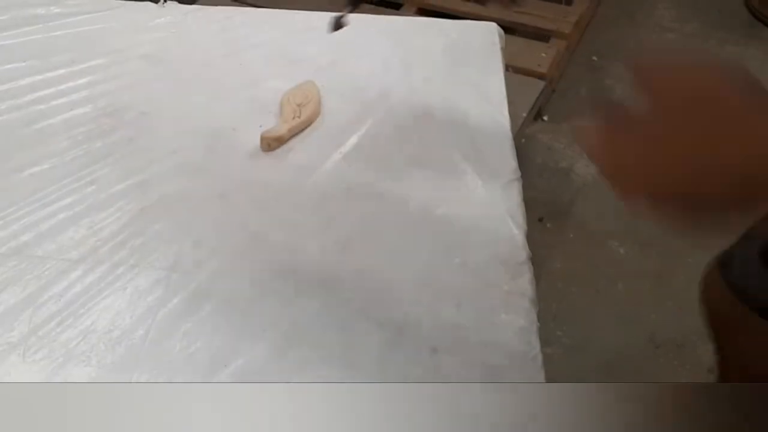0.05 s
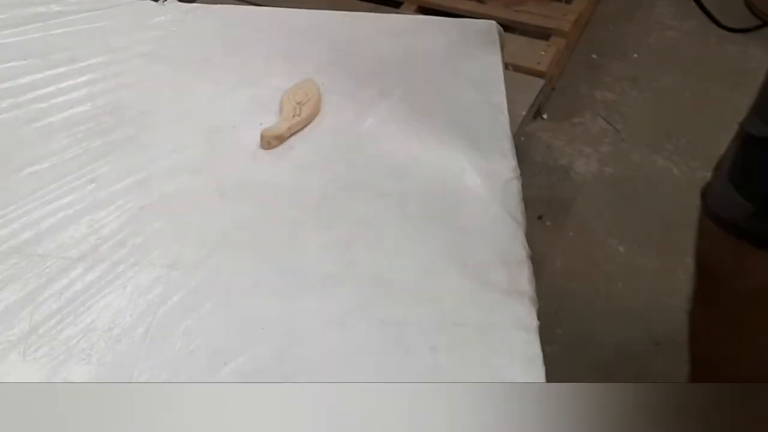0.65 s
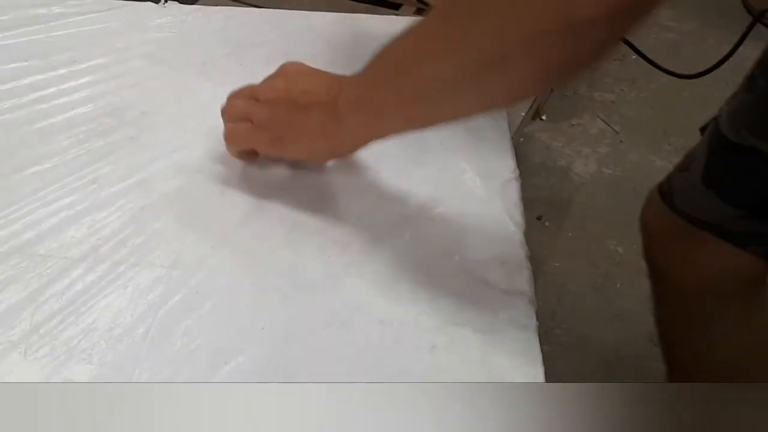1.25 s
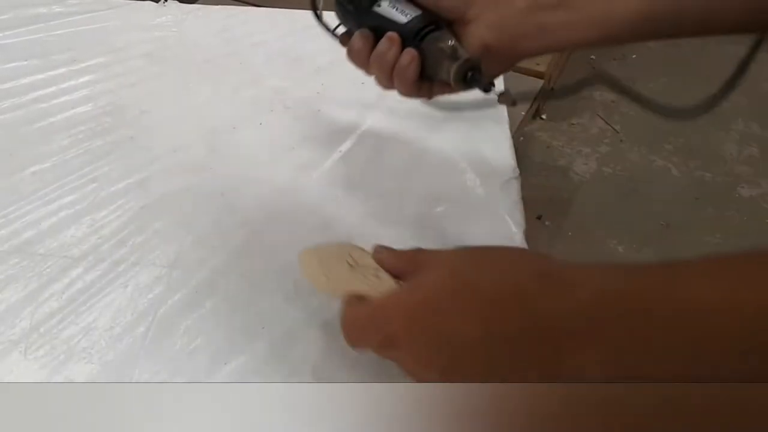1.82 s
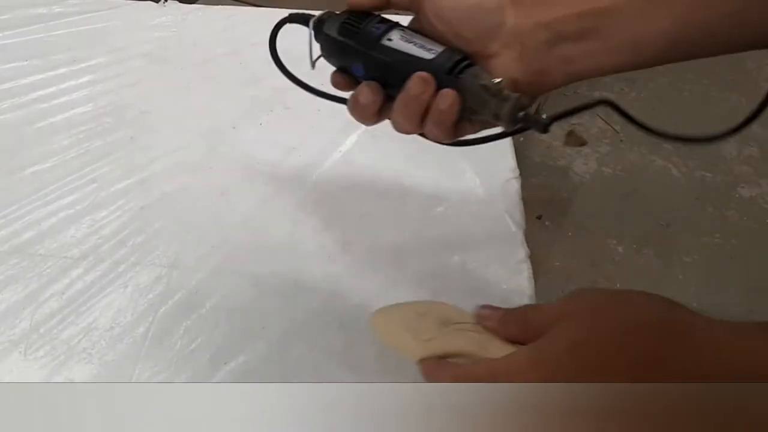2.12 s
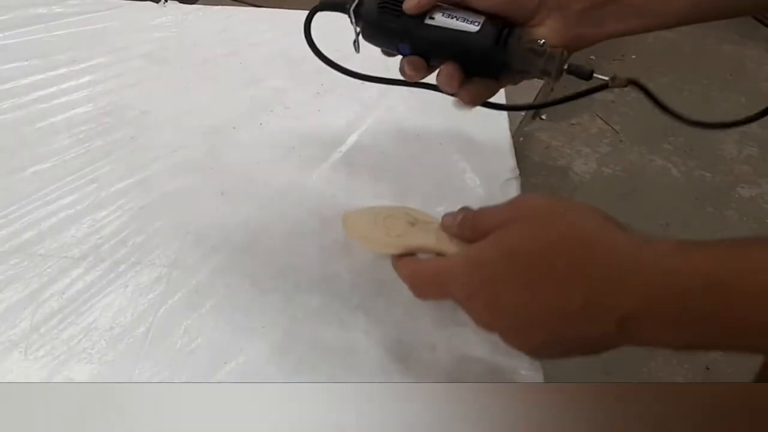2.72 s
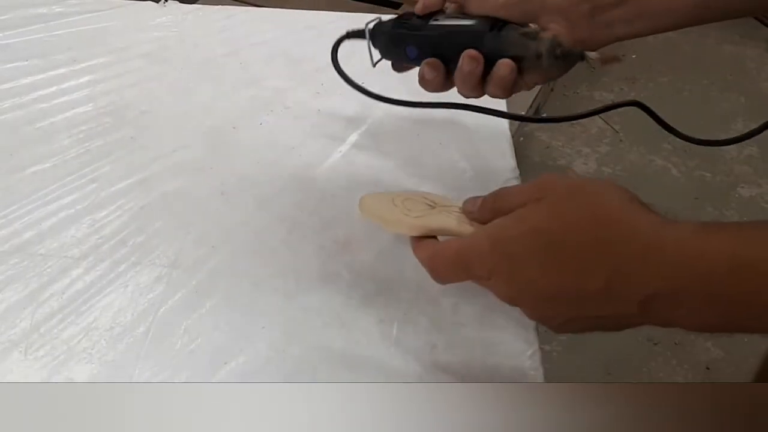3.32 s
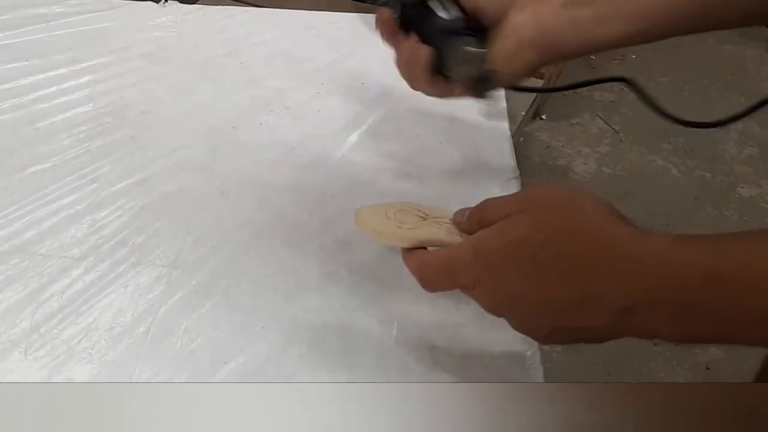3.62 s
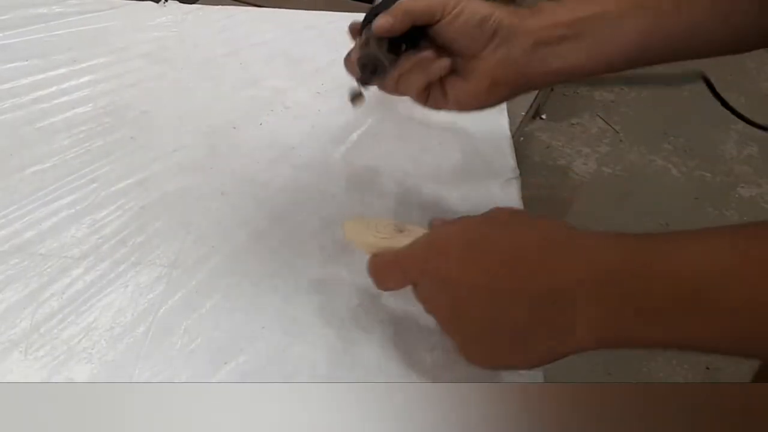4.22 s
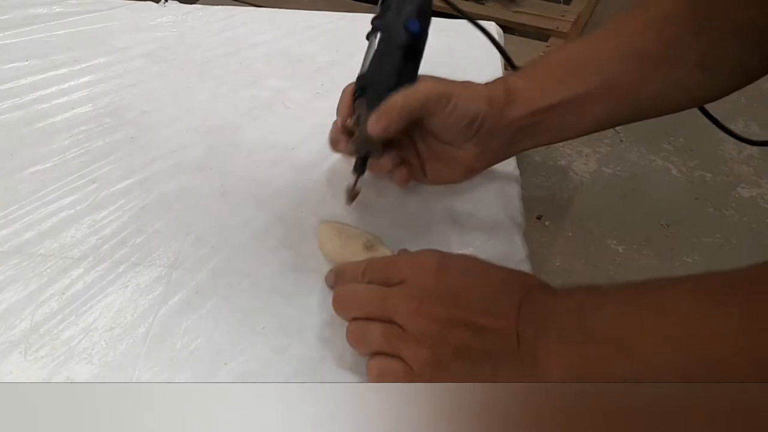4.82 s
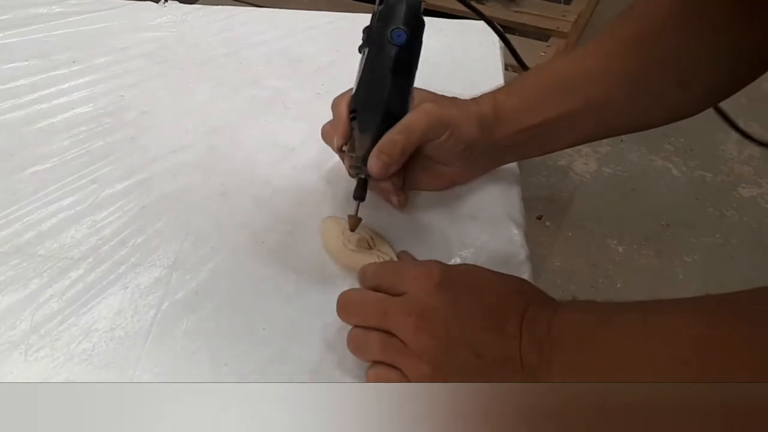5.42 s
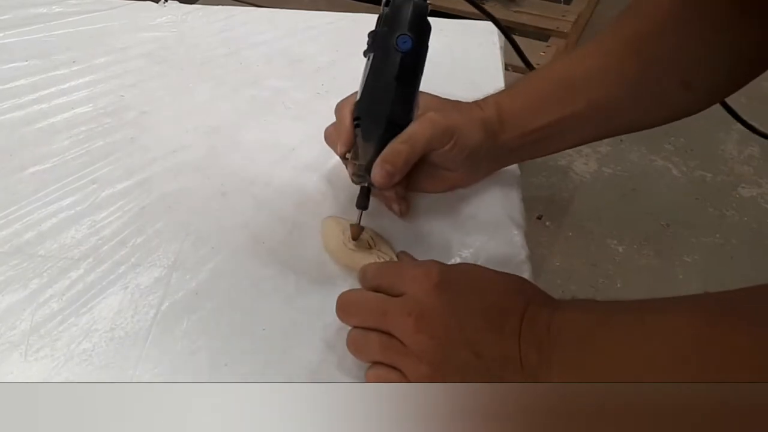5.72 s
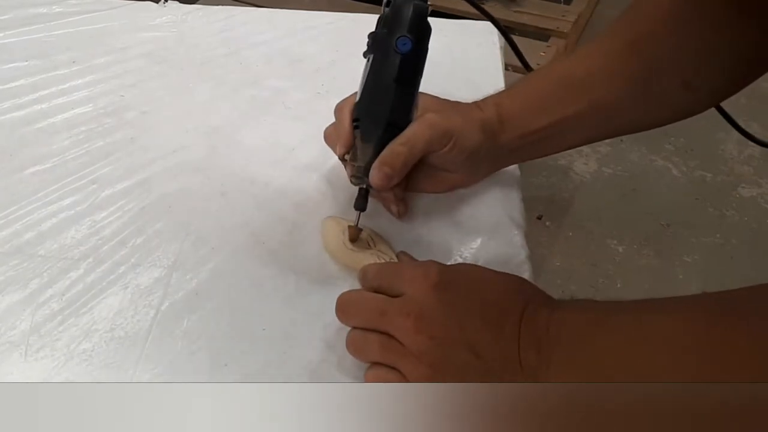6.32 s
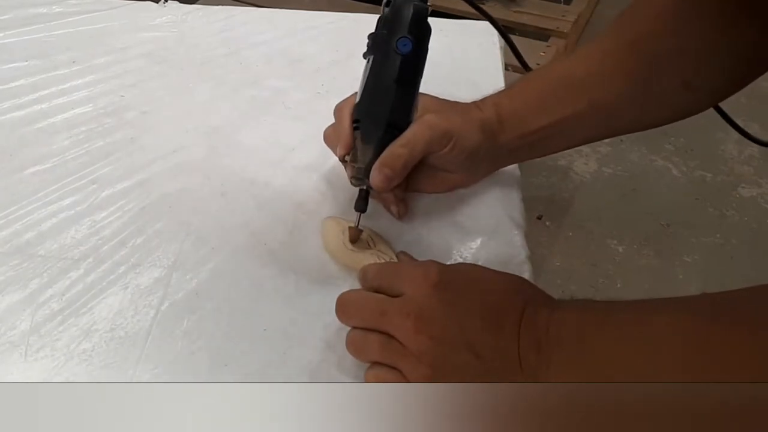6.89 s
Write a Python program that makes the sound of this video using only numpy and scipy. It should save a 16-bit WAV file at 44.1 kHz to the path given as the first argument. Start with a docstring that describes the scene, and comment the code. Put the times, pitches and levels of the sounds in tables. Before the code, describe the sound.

A small piece of wood scrapes off a bench, then a rotary tool clicks on, winds up to a whine and grinds into it.

```python
"""A rotary tool winds up to a whine, then its burr (the cutting tip) bites wood with a loud, pitched drone.
The mains motor buzzes and hums, while its fan whistles and blows air through the vents.
The tool's tones follow the speed of its shaft, which sags once the burr is deep in the wood.
Before that, a hand slides a small piece of wood off a sheet-covered bench and clicks the switch.
Other machines hum far off in the workshop throughout."""
import sys
import numpy as np
from scipy import signal
from scipy.fft import rfft, irfft, next_fast_len
from scipy.io import wavfile
from scipy.ndimage import map_coordinates

SR = 44100
rng = np.random.default_rng(int(sys.argv[2]) if len(sys.argv) > 2 else 0)


def log_audio(samples):
    """Write samples as a 16-bit WAV file to the path given in sys.argv[1]."""
    # one column per channel
    frames = np.atleast_2d(samples).T
    # limit to full scale, then quantise
    limited = np.clip(frames, -1, 1)
    pcm = np.round(limited * 32767).astype(np.int16)
    wavfile.write(sys.argv[1], SR, pcm)


N = 315315
TIME = np.arange(N) / SR
SIDES = np.array([[1], [-1]]) / 2  # splits a difference between left and right
MAINS_HZ, FULL_SPEED_HZ = 60, 413  # the electric supply; shaft turns a second
MOTOR_ON_S, DEEP_CUT_S = 3.304, 6.417
SWING_START_S, SWING_LENGTH_S = 3.7, 0.33  # the tool is swung round towards the bench


def amp(db):
    """Turns decibels into a number to multiply a sound by."""
    return 10 ** (np.asarray(db) / 20)


def unit(x):
    """Scales a signal to an average strength (rms) of 1."""
    return x / np.sqrt(np.mean(x ** 2) + 1e-20)


def along(points, hz):
    """Reads between rows of (pitch_hz, value), with octaves evenly spaced."""
    pitches, values = np.transpose(points)
    return np.interp(np.log(hz + 1), np.log(pitches + 1), values)


def curves(rows):
    """Joins timed rows into one curve for each column after the time."""
    times, *columns = np.transpose(rows)
    return [np.interp(TIME, times, column) for column in columns]


def wobble(rate):
    """A smooth curve through `rate` random values a second."""
    return map_coordinates(rng.standard_normal(int(N * rate / SR) + 4), [TIME * rate])


def settle(start_s, rise_s):
    """Rises from 0 towards 1, getting about two thirds of the way in rise_s."""
    return 1 - np.exp(-np.maximum(TIME - start_s, 0) / rise_s)


def until(start_s, length_s):
    """1 before a movement of the hand, falling to 0 once it is done."""
    return np.clip(1 - (TIME - start_s) / length_s, 0, 1)


def driven(speed, full_db, range_db):
    """Strength of a sound that starts with the motor and grows by range_db up to full speed."""
    return amp(full_db - range_db * (1 - speed / FULL_SPEED_HZ)) * (TIME > MOTOR_ON_S)


def pan(left_db):
    """Left and right strengths, with the left louder by left_db."""
    return amp(left_db * SIDES)


def filtered(x, response):
    """Multiplies each frequency in x by response(hz)."""
    size = next_fast_len(N + SR // 4)
    return irfft(rfft(x, size) * response(np.fft.rfftfreq(size, 1 / SR)), size)[..., :N]


def partials(table, angle, waver_db, slip=0):
    """Wavering tones at whole multiples of the shaft speed; slip holds their waves back."""
    def tone(multiple):
        return np.sin(round(multiple) * angle - slip + rng.uniform(0, 2 * np.pi))
    return np.sqrt(2) * sum(amp(db + waver_db * wobble(14)) * pan(left_db) * tone(multiple)
                            for multiple, db, left_db in table)


# how alike a close sound is on the left and right (1 = the same): pitch_hz, likeness
NEAR_LIKENESS = [(100, 1), (640, 0.64), (1400, 0.69), (6000, 0.33), (15000, 0.24)]
def noise(spectrum, likeness=NEAR_LIKENESS):
    """Stereo noise of a standard strength, coloured by rows of (pitch_hz, relative_db)."""
    def colour(hz):
        spread = np.arccos(np.clip(along(likeness, hz), -1, 1)) / 2
        return amp(along(spectrum, hz)) * [np.cos(spread), np.sin(spread)]
    mid, side = filtered(rng.standard_normal((2, N)), colour)
    return np.array([mid + side, mid - side]) / np.std(mid)


# the room's low rush and its faint high hiss: pitch_hz, relative_db
RUSH_COLOUR = [(25, -50), (55, -9), (80, -14), (112, -2), (150, -7.5), (205, -3.5), (270, -7.5), (420, -2),
               (800, -8.5), (1300, -14.5), (2200, -20), (3200, -32), (8000, -59)]
HISS_COLOUR = [(1000, -18), (5600, -7.5), (6150, 1.5), (7500, -0.5), (8600, -12.5), (9600, -6.5),
               (16000, -7.5)]
# how alike the room sounds on the left and right: pitch_hz, likeness
ROOM_LIKENESS = [(60, 0.91), (180, 0.99), (550, 0.47), (1650, -0.26), (4970, -0.029), (15000, -0.018)]
# machines humming far off: pitch_hz, relative_db
MACHINE_HUMS = [(118.4, -59), (209.9, -57), (398.4, -59), (796.7, -60.5), (1157, -114), (1195, -64)]
def workshop(rush_db, hum_db, hiss_db):
    """Distant machines fill the room with a rush and wavering hums, under a faint hiss."""
    hums = sum(amp(db + 1.7 * wobble(5)) * np.sin(2 * np.pi * hz * TIME + 0.66 * wobble(7))
               for hz, db in MACHINE_HUMS)
    rush = amp(rush_db) * noise(RUSH_COLOUR, ROOM_LIKENESS)
    hiss = amp(hiss_db) * noise(HISS_COLOUR, ROOM_LIKENESS)
    return rush + amp(hum_db) * hums + hiss


# how long the echo takes to fade by 60 dB: pitch_hz, fade_s
ECHO_FADES = [(200, 0.11), (2000, 0.74), (12000, 0.2)]
def wall_echo(x):
    """Sound bounces between the walls, each pitch dying away at its own speed."""
    hz, t, spectra = signal.stft(rng.standard_normal((2, SR // 2)), SR, nperseg=256)
    fade = amp(-60 * t / along(ECHO_FADES, hz)[:, None])
    tail = signal.istft(spectra * fade, SR, nperseg=256)[1]
    return signal.fftconvolve(x, tail / np.linalg.norm(tail[0]), axes=1)[:, :N]


# fingertips touching the sheet: start_s, level_db, fade_s
SHEET_TOUCHES = [(1.118, -50, 0.12), (1.162, -59, .45), (1.215, -54, .07)]
# the sheet's bright crackle: pitch_hz, relative_db
SHEET_COLOUR = [(800, -12), (3000, -4), (9000, 1), (14500, -1)]
def sheet_crinkle(grain_db):
    """The sheet on the bench crackles under the fingertips."""
    touches = sum(amp(db - 60 * np.maximum(TIME - start_s, 0) / fade_s) * (TIME > start_s)
                  for start_s, db, fade_s in SHEET_TOUCHES)
    return touches * noise(SHEET_COLOUR) * unit(amp(grain_db * wobble(900)))


# fingers, then the wood, rubbing on the bench: start_s, length_s, level_db
RUBS = [(1.165, .09, -53), (1.415, 0.057, -59.5), (1.548, 0.053, -38)]
# the dull sound of rubbing: pitch_hz, relative_db
SCRAPE_COLOUR = [(180, -24), (400, -10), (630, -2), (820, -8.5), (1100, -2.5), (1450, -3.5), (1850, -9.5),
                 (2500, -9.5), (4000, -14.5), (6300, -21), (16000, -22)]
def bench_scrape(grain_db, rise_db_per_s, fall_db_per_s):
    """Fingers and wood scrape over the sheet; each grainy rub swells, holds and dies away."""
    rubs = 0
    for start_s, length_s, db in RUBS:
        before_s = np.maximum(start_s - TIME, 0)
        after_s = np.maximum(TIME - start_s - length_s, 0)
        rubs += amp(db - rise_db_per_s * before_s - fall_db_per_s * after_s)
    return rubs * noise(SCRAPE_COLOUR) * unit(amp(grain_db * wobble(500) + 1.1 * wobble(50.65)))


# hand and wood bumping the bench: start_s, level_db, pitch_hz
BENCH_BUMPS = [(1.114, -42, 106), (1.161, -42, 113), (4.762, -28, 279), (4.848, -32, 218),
               (4.878, -31, 237), (6.8, -36.5, 124), (6.87, -50, 140.1), (6.918, -36, 121)]
def bench_bumps(rise_s, fade_s):
    """Each bump makes the bench thud with two low, short-lived tones."""
    out = 0
    for start_s, db, hz in BENCH_BUMPS:
        age = np.maximum(TIME - start_s, 0)
        thud = np.sin(2 * np.pi * hz * age) + .5 * np.sin(2 * np.pi * 0.61 * hz * age)
        out += amp(db - 60 * age / fade_s) * (1 - np.exp(-age / rise_s)) * thud
    return out


def switch_click(start_s, level_db, fade_s):
    """The switch snaps on with a tiny burst of bright noise."""
    age = np.maximum(TIME - start_s, 0)
    snap = (age > 0) * amp(level_db - 60 * age / fade_s)
    return snap * noise([(300, -14), (3000, -1), (6500, 0), (15000, -13)])


# air hissing through the vents: pitch_hz, relative_db
VENT_COLOUR = [(150, -16), (400, -1.5), (900, -2.5), (2300, 3.5), (2850, -2), (3800, -0.5), (5800, 0),
               (6600, 1.5), (7900, 2.5), (8750, -11), (9250, -3), (11500, -4), (14500, -1), (16000, -7)]
# the roar in the hollow between hand and vents: time_s, relative_db, pitch_hz
HAND_HOLLOW = [(3.9, -41.5, 1763), (4.09, -35, 1960), (4.61, -40.5, 2021), (4.83, -40, 1648),
               (6.15, -36.5, 1432)]
def cooling_air(speed, hiss_db, roar_db, width_hz, swing_db):
    """Cooling air hisses from the vents and roars in a hollow whose pitch shifts with the grip."""
    hollow_db, hollow_hz = curves(HAND_HOLLOW)
    hiss = noise(VENT_COLOUR) * amp(0.68 * wobble(12) + 0.47 * wobble(60))
    swirls = noise([(1, 0), (width_hz, -3), (3 * width_hz, -20), (4000, -70)], likeness=[(100, 0.33)])
    # multiplying by a tone lifts the low swirls up to the hollow's pitch
    hollow_tone = np.cos(2 * np.pi * np.cumsum(hollow_hz + 120 * wobble(300)) / SR)
    roar = np.sqrt(2) * swirls * hollow_tone
    flow = driven(speed, hiss_db - swing_db * until(SWING_START_S, SWING_LENGTH_S), range_db=14)
    return flow * hiss + driven(speed, hollow_db + roar_db, range_db=18.5) * roar


# the whistle's loudness as the tool is moved about: time_s, relative_db
WHISTLE_LEVELS = [(3.75, -38.5), (3.88, -31), (4.33, -40.5), (4.57, -33), (4.71, -40), (5.16, -35),
                  (5.2, -29.5), (5.43, -33.5), (5.88, -32), (6.06, -42), (6.14, -30.5), (6.82, -34.5),
                  (6.84, -40), (7.05, -32), (7.15, -37)]
# the blades' tone, and its overtone an octave up: shaft_multiple, relative_db, left_db
BLADE_TONE = [(18, 1, -0.5)]
BLADE_OVERTONE = [(36, -10, 7.1)]
def fan_whistle(speed, angle, gain_db):
    """The fan's eighteen blades whistle, louder and brighter with speed."""
    moving_db, = curves(WHISTLE_LEVELS)
    overtone = driven(speed, 0, range_db=74) * partials(BLADE_OVERTONE, angle, waver_db=-0.5)
    slow_db = 52 * np.maximum(.85 - speed / FULL_SPEED_HZ, 0)  # quieter below 85% of full speed
    strength = amp(gain_db + moving_db - slow_db) * (TIME > MOTOR_ON_S)
    return strength * (partials(BLADE_TONE, angle, waver_db=1.13) + overtone)


# the knocking shaft: shaft_multiple, relative_db, left_db
KNOCK_TONES = [(2, -3.5, 0), (3, -7, 0), (4, -6.5, 0), (6, -8, 0), (9, -12, 0), (16, -8, 0), (17, -13, 0),
               (19, -18, 0), (23, -10, 0), (26, -23, 0.0058)]
def motor_hum(speed, angle, hum_db, coils_db, swing_db):
    """The off-balance shaft hums and knocks as it turns; the coils hum with the mains."""
    mains = 2 * np.pi * MAINS_HZ * TIME
    coils = amp(coils_db) * (np.sin(mains) + np.sin(2 * mains))
    turned_away_db = swing_db * until(SWING_START_S, SWING_LENGTH_S)
    steadied_db = 19 * settle(DEEP_CUT_S, rise_s=0.62)  # pressing the burr in steadies the shaft
    strength = driven(speed, hum_db - turned_away_db - steadied_db, range_db=61)
    imbalance = np.sqrt(2) * amp(-0.5 + 3.0 * wobble(8)) * np.sin(angle)
    knock = partials(KNOCK_TONES, angle, waver_db=2.3)
    # lowering the tool to the bench brings out its knock and coil hum
    lowered = amp(-8 * until(start_s=4.28, length_s=0.35))
    return strength * (imbalance + lowered * (knock + coils))


# pitches at which the buzz swells (ringing of the case, then one brief swell # as the tool is moved): pitch_hz,
# half_width_hz, boost_db
BUZZ_SWELLS = [(1690, 190, 5.5), (2266, 490, 16), (2423, 98, 9.5), (2638, 155, 16.5), (3068, 29, 4.5),
               (3191, 19.5, 8)]
# overtones of the buzz: shaft_multiple, relative_db, left_db
BUZZ_OVERTONES = [(16, 1, 1), (24, -3.5, 3), (32, -5.5, 3)]
# how the plastic shell colours those overtones: pitch_hz, gain_db
SHELL_COLOUR = [(1200, -16), (1800, -10), (2350, 3), (2800, -7), (3300, 4.5), (4200, -5), (5500, -10.5),
                (7500, -6.5), (10000, -19), (14000, -16)]
def motor_buzz(speed, angle, buzz_db, overtone_db, pulse_depth):
    """Eight slots in the spinning core pass the magnets, whose pull pulses twice per mains wave."""
    pulse_angle = 2 * np.pi * 2 * MAINS_HZ * TIME
    pull = unit((1 + pulse_depth * np.cos(pulse_angle)) * amp(1.05 * wobble(120)))
    speed_share = speed / FULL_SPEED_HZ
    # the core judders while it gathers speed and smooths out near full speed
    judder = 1.65 * (1 - speed_share) * wobble(150)
    core_angle = angle + judder / 8
    ripple = speed_share ** 4 * np.sin(pulse_angle - 1.39)  # each pulse also nudges the turning
    slot_tone = partials([(8, 0, 4)], core_angle, waver_db=.6, slip=1.33 * ripple + 0.39 * SIDES)
    swell_db = sum(db * np.exp(-((8 * speed - hz) / width) ** 2) for hz, width, db in BUZZ_SWELLS)
    overtones = partials(BUZZ_OVERTONES, core_angle, waver_db=1.0, slip=0.4 * ripple)
    overtones = filtered(overtones, lambda hz: amp(along(SHELL_COLOUR, hz)))
    # the overtones follow the electric current, which is highest at the start
    current = amp(overtone_db + 12 * (1 - speed_share)) * settle(MOTOR_ON_S, rise_s=0.14)
    return pull * (driven(speed, buzz_db + swell_db, range_db=17) * slot_tone + current * overtones)


# three overlapping stages of winding up: speed_gained_hz, rise_s
WIND_UP_STAGES = [(140.9, .0648), (201, .224), (79.47, 1.344)]
def spinning_shaft(sag_hz, flutter_hz):
    """The shaft winds up, then slows under the cut; gives its speed and its slightly unsteady angle."""
    speed = sum(hz * settle(MOTOR_ON_S, rise_s) for hz, rise_s in WIND_UP_STAGES)
    speed -= sag_hz * settle(DEEP_CUT_S, rise_s=2)
    angle = 2 * np.pi * np.cumsum(speed + flutter_hz * wobble(40)) / SR
    return speed, angle


# the burr biting the wood: shaft_multiple, relative_db, left_db
BITE_TONES = [(4, -3, 7.5), (5, -8, -4.5), (10, -26.5, -11)]
# weaker tones of the chattering burr, played chatter_hz lower: shaft_multiple, relative_db, left_db
CHATTER_TONES = [(4, -20.5, -5), (5, -17, -2), (6, -18, 0)]
# the ragged screech of the deep cut: shaft_multiple, relative_db, left_db
SCREECH_TONES = [(23, -25, 1), (26, -24, 1.1), (30, -22, 8.8), (31, -29, 4), (32, -25, 4)]
def burr_cut(angle, start_s, graze_s, cut_db, graze_db, chatter_hz):
    """The burr bites once a turn, shaking the wood and throwing a puff of dust."""
    squeal_fade = amp(-9 * np.maximum(TIME - DEEP_CUT_S, 0))  # 9 dB a second
    squeal = squeal_fade * partials([(6, -4, -2)], angle, waver_db=1.7)
    bite = partials(BITE_TONES, angle, waver_db=1.0) + squeal
    chatter = partials(CHATTER_TONES, angle, waver_db=1.0, slip=2 * np.pi * chatter_hz * TIME)
    drone = np.sqrt(2) * amp(-2) * pan(5.5) * np.sin(angle)
    # the motor's pulsing pull adds a tone just below the drone
    throb = amp(-12) * np.sin(angle - 2 * np.pi * 2 * MAINS_HZ * TIME)
    puffs = unit((1 + np.cos(angle)) ** 2)
    dust = noise([(1000, -10), (2500, 9), (4200, -8), (6000, -4), (10000, -8), (12500, 3), (15000, -12)])
    screech = partials(SCREECH_TONES, angle, waver_db=2.5) + amp(-10) * puffs * dust
    # one light graze, then the burr is pressed in: the bite comes fast, the wood's drone more slowly
    graze = amp(graze_db) * np.exp(-((TIME - graze_s) / 0.011) ** 2)
    contact = amp(cut_db) * settle(start_s, rise_s=0.12) + graze
    wood_shake = amp(cut_db) * settle(start_s, rise_s=0.22)
    depth = settle(DEEP_CUT_S, rise_s=0.18)
    return contact * (bite + chatter + depth * screech) + wood_shake * (drone + throb)


# the highest pitches are louder on the microphone's left side: pitch_hz, left_db
TREBLE_LEAN = [(3000, -0.54), (7000, 1), (10000, 5), (15000, 2)]
def scene():
    """The tool and hands are close to the microphone, with the workshop around them."""
    speed, angle = spinning_shaft(sag_hz=24.6, flutter_hz=.12)
    buzz = motor_buzz(speed, angle, buzz_db=-42, overtone_db=-40, pulse_depth=0.81)
    hum = motor_hum(speed, angle, hum_db=-41.5, coils_db=-21, swing_db=2.9)
    hands = bench_scrape(grain_db=2, rise_db_per_s=320, fall_db_per_s=242)
    hands += switch_click(start_s=3.299, level_db=-35.5, fade_s=.025)
    hands += bench_bumps(rise_s=0.0023, fade_s=0.096)
    hands += sheet_crinkle(grain_db=3)
    whistle = fan_whistle(speed, angle, gain_db=-1)
    cut = burr_cut(angle, start_s=6.246, graze_s=6.19, cut_db=-25.5, graze_db=-36, chatter_hz=52.2)
    air = cooling_air(speed, hiss_db=-33.5, roar_db=-1.5, width_hz=244, swing_db=2.6)
    near = hands + air + whistle + hum + buzz + cut
    delay_s = 3.3e-5 * SIDES  # the sound reaches the left side a touch later
    direct = filtered(near, lambda hz: pan(along(TREBLE_LEAN, hz)) * np.exp(-2j * np.pi * hz * delay_s))
    echo = amp(-8.5) * wall_echo(hands + amp(-1.5) * whistle + hum + buzz)
    return direct + echo + workshop(rush_db=-49.5, hum_db=0.5, hiss_db=-60)


def record(dry):
    """The level dips briefly once, and the very highest pitches are cut off."""
    dip_s, depth_db, hold_s, recovery_s = 6.989, 11, .006, .005
    top_hz = 15800
    dip_db = -depth_db * (TIME > dip_s) * (1 - settle(dip_s + hold_s, recovery_s))
    return filtered(dry * amp(dip_db), lambda hz: hz < top_hz)


dry = scene()
out = record(dry)
log_audio(out)
```